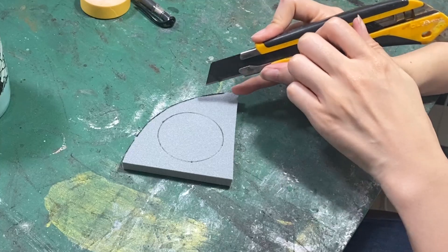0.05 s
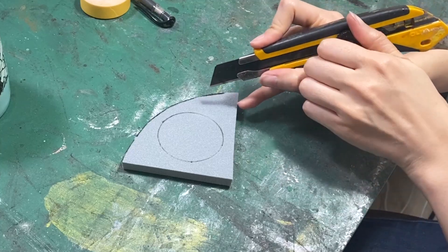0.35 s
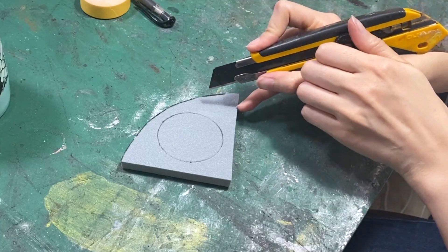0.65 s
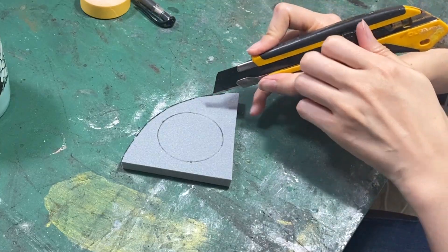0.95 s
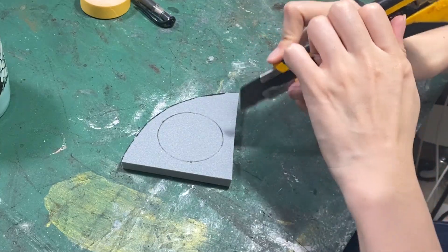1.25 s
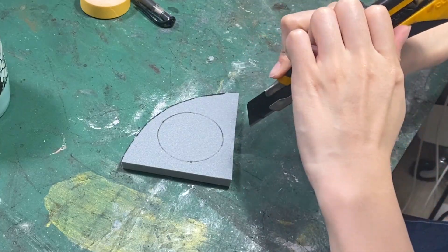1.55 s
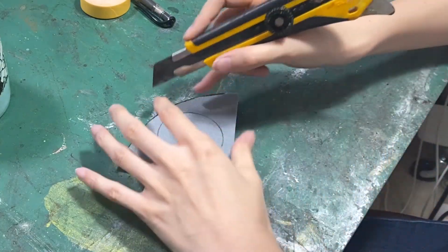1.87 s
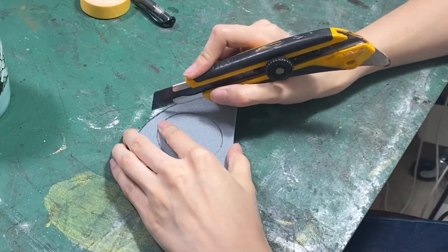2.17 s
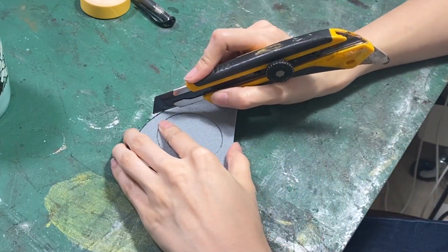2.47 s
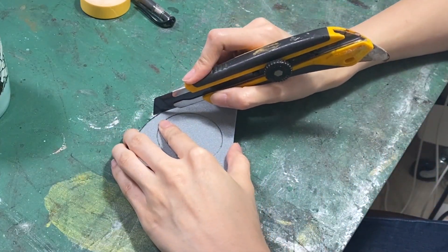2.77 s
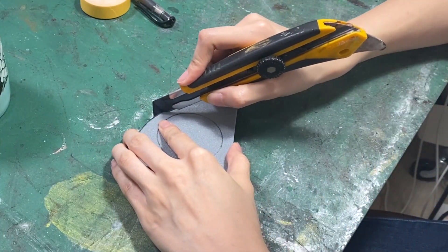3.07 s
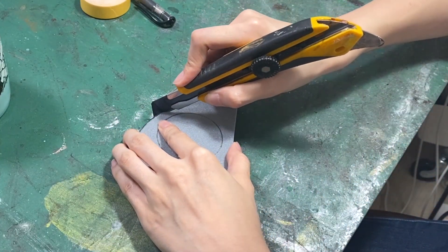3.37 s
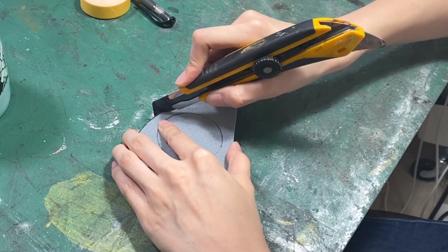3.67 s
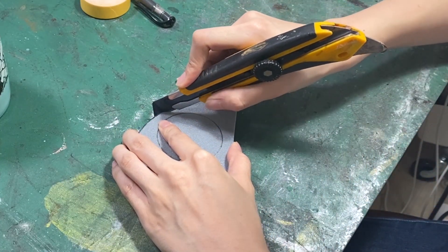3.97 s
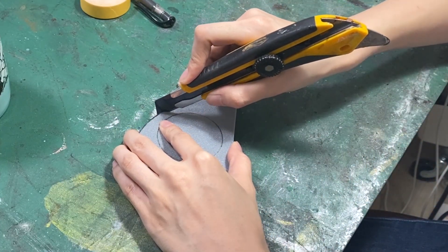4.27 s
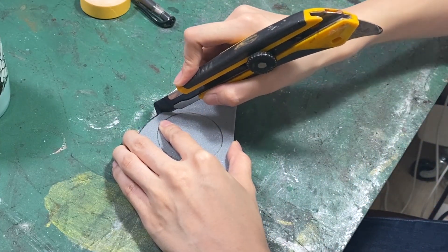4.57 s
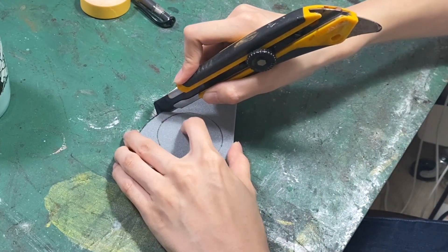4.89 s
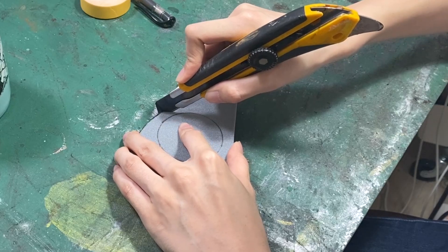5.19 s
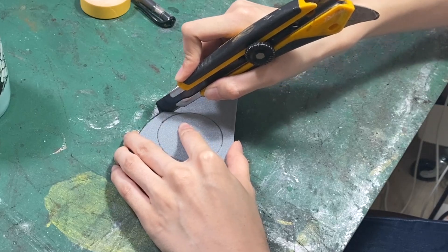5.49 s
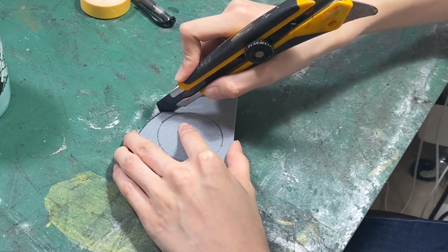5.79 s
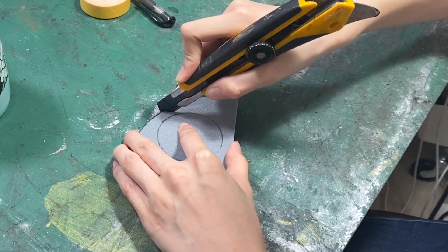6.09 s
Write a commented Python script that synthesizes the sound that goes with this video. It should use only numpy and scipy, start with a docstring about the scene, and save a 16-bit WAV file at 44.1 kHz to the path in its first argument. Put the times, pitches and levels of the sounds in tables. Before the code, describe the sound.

A craft knife blade ratchets out and back with sharp clicks, then faintly scratches through foam board in a quiet room.

```python
"""Craft knife and foam board

A knife's slider ratchets six notches out and seven back above a work table in a quiet, ventilated room.
Each notch snaps it against the steel channel and the blade rings; the colour follows the slider's place.
Then the tip is drawn through foam board: a gritty hiss, with faint scratches, squeaks, ticks and knocks.
"""
import sys
import numpy as np
from scipy import signal
from scipy.fft import rfft, irfft
from scipy.io import wavfile

SR = 44100
rng = np.random.default_rng(int(sys.argv[2]) if len(sys.argv) > 2 else 0)


def pcm_store(signal):
    """Save signal as 16-bit PCM."""
    levels = np.round(np.clip(np.atleast_2d(signal), -1, 1) * 32767)
    wavfile.write(sys.argv[1], SR, levels.astype(np.int16).T)


N = 279594
TIME = np.arange(N) / SR

# the broad, bright crack of a snap: (frequency [Hz], level [dB])
CRACK_COLOUR = [(200, -24.5), (1100, -14), (1700, -20), (2250, -16), (2650, 6.5), (3150, -11), (4200, -9),
                (5800, -6), (7000, -5.5), (8200, -1.5), (9400, 1.5), (11500, 3.5), (13000, 2),
                (13500, -1.5), (14300, 7), (15500, 8), (16200, -1)]
# the rasp of tearing foam, also used for the spring's scrape: (frequency [Hz], level [dB])
RASP_COLOUR = [(500, -2), (2500, -6), (4600, 1.5), (6000, -6.5), (7000, -9.5), (8500, -1), (10200, -0.5),
               (12000, -6.5), (13500, -3.5), (15400, -5), (16000, -35.5)]


def ratchet(turn_s=.6, scatter=0.027, rattle_db=-5, housing_hz=2300, housing_t60=0.005, scrape_db=-49):
    """Each notch snaps home and rings channel, spring and blade. Returns direct sound and room send."""
    # one snap a notch: (time [s], contact [s], blade ring [Hz], blade ring [dB], spring ping [Hz],
    # spring ping [dB], spring's upper mode [dB], crack [dB])
    snaps = [(0.1665, 0.00045, 2484, -33, 11500, -31.5, -40.5, -37),
             (0.1983, 0.00029, 2456, -32.5, 11400, -32.5, -36.5, -34.5),
             (0.223, 0.00036, 2430, -37.5, 11100, -30, -33, -34),
             (0.2411, 0.00018, 2450, -35, 10900, -41, -36, -34.5),
             (0.2921, 0.0003, 2466, -32, 11200, -43, -36.5, -42),
             (0.3495, 0.00077, 2432, -30.5, 11130, -43.5, -34, -42.5),
             (0.9429, 0.0005, 2380, -38, 11200, -34, -30.5, -35.5),
             (0.9735, 0.0008, 2350, -39, 11100, -34, -30.5, -35),
             (1.0093, 0.0004, 2360, -38, 11400, -37, -29, -36.5),
             (1.0616, 0.00057, 2445, -36.5, 11200, -35, -44.5, -38.5),
             (1.1528, 0.00027, 2455, -38.5, 12250, -29, -38.5, -33.5),
             (1.2703, 0.00012, 2480, -39.5, 11250, -29, -47, -34.5),
             (1.3957, 0.00022, 2470, -38, 12030, -31, -32.5, -37)]
    # short-lived modes of the steel channel: (frequency [Hz], width [Hz],
    # going out (level at notch 0 [dB], step per notch [dB]), coming back (the same))
    channel_modes = [(3870, 350, (-50.5, 0.78), (-58.5, 0.16)), (5040, 460, (-62, 2.9), (-50.5, 0.31)),
                     (6100, 510, (-68.5, 0.72), (-59, 1)), (7044, 1300, (-48, 1.9), (-55.5, 4.1)),
                     (8890, 1100, (-39, -1.1), (-40.5, -0.8))]
    # the blade's pair of modes, a row for out and a row for back:
    # (partner's offset [Hz], partner's level [dB], t60 [s], room send [dB])
    blade_modes = [(152.5, -12.5, 0.017, -6.5), (234.6, -4.5, 0.0089, -1.5)]
    # the blade's ring bouncing off things nearby: (delay [s], level [dB])
    echoes = [(.0064, -28.5), (0.0109, -18.5), (0.0192, -26)]
    spring_top_hz, spring_width_hz = 15100, 2100
    spring_send_db, channel_send_db = -14.5, -3.5
    mode_lead_s, scrape_lead_s = .0001, 256 / SR
    direct, send = np.zeros((2, N))
    t = np.arange(2048) / SR

    def radiate(s, sound, send_db=0):
        """Feeds one layer of a snap to the direct sound and the room send."""
        add(direct, s, sound)
        add(send, s, amp(send_db) * sound)

    notch = 1
    for s, contact, ring_hz, ring_db, ping_hz, ping_db, top_db, crack_db in snaps:
        way = int(s > turn_s)  # 0 out, 1 back
        notch += -1 if way else 1
        # every notch loads the channel differently and shifts its modes a little
        modes = []
        for hz, width, *levels in channel_modes:
            base_db, step_db = levels[way]
            shift = 1 + scatter * rng.standard_normal()
            modes.append((hz * shift, width, base_db + step_db * notch, channel_send_db))
        modes.append((ping_hz, spring_width_hz, ping_db, spring_send_db))
        modes.append((spring_top_hz, spring_width_hz, top_db, spring_send_db))
        for hz, width, db, send_db in modes:
            mode = t * np.exp(-np.pi * width * t) * np.sin(2 * np.pi * (hz * t + rng.random()))
            # one clean hit; the loose blade rattles on for a few milliseconds
            rattle = signal.fftconvolve(chatter(t, 0.00045), mode)[:len(t)]
            hit = blow(blow(mode) + amp(rattle_db) * blow(rattle))
            radiate(s - mode_lead_s, amp(db) * hit, send_db)
        # two close bending modes start in opposite directions
        offset_hz, partner_db, t60, send_db = blade_modes[way]
        partner = amp(partner_db) * np.sin(2 * np.pi * (ring_hz + offset_hz) * t)
        blade = (np.sin(2 * np.pi * ring_hz * t) - partner) * amp(-60 * t / t60)
        # the plastic housing adds a dull tock just under the ring
        tock = np.sin(2 * np.pi * housing_hz * t) * amp(-60 * t / housing_t60)
        attack = 1 - np.exp(-t / (contact + 0.00027))
        ring = amp(ring_db) * blow((blow(blade) + amp(-11) * blow(tock)) * attack)
        radiate(s, ring, send_db)
        for delay, db in echoes:
            add(direct, s + delay, amp(db) * ring)
        # the spring scrapes up the tooth, then drops with a crack
        climb = np.exp(-abs(t - scrape_lead_s) / .0012) * (t < scrape_lead_s)
        scrape = blow(colour(rng.standard_normal(len(t)) * climb, RASP_COLOUR))
        crack = blow(colour(chatter(t - scrape_lead_s, contact), CRACK_COLOUR))
        radiate(s - scrape_lead_s, amp(crack_db) * crack + amp(scrape_db) * scrape)
    return highpass([direct, send], hz=1600)  # so small a body radiates few lows


def chatter(t, contact_s):
    """Metal meets metal in a burst of tiny contacts that swells and quickly dies."""
    age = np.maximum(t, 0) / max(contact_s, 1 / SR)
    return rng.standard_normal(len(t)) * age * np.exp(-age)


def slider_rub():
    """Steel rubs on steel, harder and harder, as the thumb takes hold and as a run starts."""
    # swelling rubs: (time [s], length [s], final level [dB])
    rubs = [(0.068, 0.079, -79.5), (0.152, .012, -64), (0.666, 0.043, -85), (0.922, 0.07, -56.5)]
    # thin steel friction: (frequency [Hz], level [dB])
    rub_colour = [(3000, -21), (5800, -2.5), (6500, 1), (7300, 1), (8200, -14.5), (16000, -18.5)]
    force = np.zeros(N)
    for s, length, db in rubs:
        add(force, s, amp(db) * np.linspace(.3, 1, int(length * SR)))
    return force * unit(colour(rng.standard_normal(N), rub_colour))


def cutting(cells_per_s=2600, body_db=-13, clump_db=0.4, clump_hz=25, squeak_width_hz=300):
    """Foam cells burst under the edge: a gritty hiss that rings the knife, with scratches and squeaks."""
    # a fingernail or the tip catches the foam: (time [s], length [s], level [dB], low cut [Hz])
    scratches = [(1.673, 0.0056, -61, 4980), (1.97, 0.018, -69, 4040), (3.046, 0.0044, -56, 4530),
                 (3.055, 0.0044, -64, 4460), (3.08, 0.021, -69, 5040), (3.098, 0.03, -66, 5000),
                 (4.234, 0.0029, -57, 3470), (4.477, 0.016, -64, 6500), (4.491, 0.022, -55.5, 6750),
                 (4.82, 0.035, -57.5, 3760), (5.152, 0.0075, -65, 5000)]
    # the tone of those scratches: (frequency [Hz], level [dB])
    scratch_colour = [(500, -2.5), (3500, -4), (4600, 0.5), (6800, -2.5), (8200, -1.5), (9500, 3),
                      (12000, -5), (13500, 3), (15400, 0), (16100, -26)]
    # foam squeaks against the edge: (time [s], length [s], pitch [Hz], level [dB])
    squeaks = [(3.43, 0.44, 7000, -90), (3.3, 0.76, 4480, -93), (5.2, .3, 4900, -103)]
    hz = np.fft.rfftfreq(N, 1 / SR)
    sizes = amp(2.5 * np.minimum(rng.exponential(1, N), 4))
    cells = rng.standard_normal(N) * sizes * (rng.random(N) < cells_per_s / SR)
    clumps = unit(irfft(rfft(rng.standard_normal(N)) * rolloff(hz, clump_hz), N))
    grit = cells * amp(clump_db * clumps)
    hiss = unit(colour(grit, RASP_COLOUR))
    body = unit(signal.fftconvolve(grit, handle_ring())[:N])
    out = pressure() * (hiss + amp(body_db) * body)
    for s, length, db, low_hz in scratches:
        age = np.arange(4096) / (length * SR / 4)  # peaks a quarter of the way in
        scratch = highpass(colour(rng.standard_normal(len(age)), scratch_colour), low_hz)
        add(out, s, amp(db) * age * np.exp(1 - age) * unit(scratch))
    for s, length, squeak_hz, db in squeaks:
        whine = unit(irfft(rfft(grit) / (1 + (2 * (hz - squeak_hz) / squeak_width_hz) ** 2), N))
        out += amp(db) * whine * stroke(s, length)
    return out


def pressure(touch_s=1.5, touch_db=-82, build_db_per_s=2):
    """Force on the foam: a resting touch, and strokes that build as the edge sinks in."""
    # a light brush, then the cuts: (time [s], length [s], mid-stroke level [dB])
    strokes = [(1.446, 0.27, -76.5), (2.99, 0.28, -77.5), (3.28, 0.7, -77), (4.518, 0.24, -75.5),
               (4.958, 0.11, -75), (5.155, 0.33, -72), (6.17, 0.08, -79)]
    force = amp(touch_db) * (TIME > touch_s)
    for s, length, db in strokes:
        build_db = build_db_per_s * (TIME - s - length / 2)
        force = np.maximum(force, stroke(s, length) * amp(db + build_db))
    return force


def stroke(s, length, press_s=0.011, release_s=0.064):
    """The hand presses, holds and lets go."""
    t = TIME - s
    return np.clip(t / press_s, 0, 1) * np.clip(1 - (t - length) / release_s, 0, 1)


def knocks_and_ticks(grit_db=-14, grit_hz=10000, tick_t60=0.015, tick_handle_db=-7):
    """The knife slips and stops, ringing its handle; the blade ticks as it shifts in the channel."""
    # knocks of the knife: (time [s], level [dB], high cut [Hz])
    knocks = [(4.208, -50.5, 14000), (4.498, -64, 1500), (5.654, -62.5, 1580)]
    # ticks of the blade: (time [s], pitch [Hz], level [dB])
    ticks = [(1.508, 3970, -69), (1.9617, 4220, -72.5), (1.983, 3940, -73), (3.416, 3760, -67.5),
             (3.821, 3930, -72), (4.323, 3670, -74), (4.5, 3660, -72.5), (6.052, 4010, -83)]
    out = np.zeros(N)
    t = np.arange(3000) / SR
    for s, db, top_hz in knocks:
        grit = blow(colour(chatter(t, 0.00048), CRACK_COLOUR))
        add(out, s, amp(db) * (handle_ring(top_hz) + amp(grit_db) * rolloff(grit_hz, top_hz) * grit))
    for s, hz, db in ticks:
        ping = np.sin(2 * np.pi * hz * t) * amp(-60 * t / tick_t60) * (1 - np.exp(-t / 0.00044))
        add(out, s, amp(db) * (blow(ping) + amp(tick_handle_db) * handle_ring()))
    return out


def handle_ring(top_hz=20000, attack_s=0.00015):
    """One ring of the held knife; a soft blow barely reaches the modes above top_hz."""
    # modes of the knife held on the table: (frequency [Hz], level [dB], t60 [s])
    modes = [(338, -3, 0.0072), (598, -3.5, 0.012), (1043, 4.5, 0.0052), (1556, -0.5, 0.0086),
             (2420, -6, 0.024), (3620, -0.5, 0.013), (4270, 5, 0.006), (5000, 2.5, 0.0053),
             (7340, -1, 0.0069), (9290, 0.5, 0.014)]
    t = np.arange(3000) / SR
    ring = np.zeros(len(t))
    for hz, db, t60 in modes:
        phase = rng.uniform(0, 2 * np.pi)
        ring += amp(db - 60 * t / t60) * rolloff(hz, top_hz) * np.sin(2 * np.pi * hz * t + phase)
    return blow(ring * (1 - np.exp(-t / attack_s)))


def table_top(x):
    """The direct sound and its first reflections off the table and the hands."""
    # early reflections: (delay [s], level [dB])
    bounces = [(.0012, -20), (.0027, -17.5), (.0052, -19.5)]
    out = x.copy()
    for delay, db in bounces:
        add(out, delay, amp(db) * x)
    return out


def room(x, predelay_s=0.0016, build_s=0.0013):
    """Dense small reflections from all round make a short stereo tail."""
    # tone of the tail: (frequency [Hz], level against the send [dB])
    tail_colour = [(500, 10), (1900, 2.5), (2300, -9.5), (2480, -9), (2600, 1), (2850, 7.5), (3600, -5),
                   (5000, -3.5), (6000, 0.5), (7000, -1.5), (8300, -6), (9500, -5.5), (11300, -2.5),
                   (13000, -4), (15400, -3.5), (16100, -30)]
    # decay of the tail: (frequency [Hz], t60 [s])
    decay_times = [(500, 0.1), (2600, 0.32), (7000, 0.26), (11000, 0.34), (15000, .2)]
    size = SR // 2
    hz, t, spectra = signal.stft(diffuse(size), SR, nperseg=256)
    t60 = read(decay_times, hz)[:, None]
    equal_energy = np.sqrt(2 * np.log(1000) / (t60 * SR))  # a longer decay is no louder
    fade = amp(read(tail_colour, hz)[:, None] - 60 * t / t60) * equal_energy
    tail = signal.istft(spectra * fade, SR, nperseg=256)[1][:, :size]
    tail *= 1 - np.exp(-np.maximum(TIME[:size] - predelay_s, 0) / build_s)
    return signal.fftconvolve(x[None], tail, axes=1)[:, :N]


def room_tone(vent_db=-59, hiss_db=-78, waver=1.2):
    """Low ventilation noise with a wavering hum and a thin hiss."""
    # rumble of the ventilation: (frequency [Hz], level [dB])
    vent_colour = [(20, -49), (33, -27), (48, -3), (70, -1), (100, -4.5), (135, 0), (205, -2.5),
                   (245, -6.5), (295, -4), (400, -4), (470, -8.5), (640, -5.5), (730, -9), (815, -7),
                   (870, -11), (1100, -11), (2200, -18), (4000, -27.5), (7000, -34), (11000, -39),
                   (16000, -60.5)]
    # high hiss: (frequency [Hz], level [dB])
    hiss_colour = [(5000, -4.5), (8400, -5.5), (9200, 4.5), (9600, -0.5), (10100, 2.5), (11600, -7.5),
                   (12400, -19), (13300, -7.5), (14000, -24), (15200, -21.5), (15900, -39)]
    # hum tones: (pitch [Hz], level [dB], waver rate [Hz])
    hums = [(50.6, -69.5, 7), (148.5, -70, 9.2), (189.8, -67.5, 15), (381.6, -74, 7), (769.5, -76.5, 18)]
    # stereo balance of the bed: (frequency [Hz], left minus right [dB])
    balance = [(60, -3.5), (130, -4.5), (290, -5.5), (640, -1.5), (1400, -0.5), (3000, 0.5)]
    hz = np.fft.rfftfreq(N, 1 / SR)
    bed = amp(vent_db) * unit(colour(diffuse(N), vent_colour))
    bed += amp(hiss_db) * unit(colour(diffuse(N), hiss_colour))
    for hum_hz, db, waver_hz in hums:
        swell, drift = unit(irfft(rfft(rng.standard_normal((2, N))) / (1 + (hz / waver_hz) ** 2), N))
        hum = (1 + waver * (swell + 1j * drift)) * np.exp(2j * np.pi * hum_hz * TIME)
        bed += amp(db) * unit(hum.real)
    return pan_bands(bed, balance)


def diffuse(size):
    """White noise as two microphones hear it, left and right alike in some bands and opposed in others."""
    # likeness of left and right: (frequency [Hz], coherence [-1 to 1])
    coherence = [(40, 0.8), (160, 0.59), (270, 0.84), (450, -0.18), (740, -0.32), (1220, -0.29),
                 (2200, 0.25), (4000, -0.13), (7500, 0.036), (8500, 0.66), (10500, 0.83), (16000, 0.81)]
    same = read(coherence, np.fft.rfftfreq(size, 1 / SR))
    left, other = rfft(rng.standard_normal((2, size)))
    return irfft(np.array([left, same * left + np.sqrt(1 - same ** 2) * other]), size)


def at_microphones(x, treble_lag_s=0.0001834, crossover_hz=8000, low_lag_s=0.000014):
    """The two microphones are nearly in step lower down; in the top treble the left one lags."""
    hz = np.fft.rfftfreq(N, 1 / SR)
    treble = (1 + np.tanh((hz - crossover_hz) / 500)) / 2
    lag_cycles = (hz * treble_lag_s - 1) * treble + hz * low_lag_s * (1 - treble)
    return np.array([irfft(rfft(x[0]) * np.exp(-2j * np.pi * lag_cycles), N), x[1]])


def pan_bands(x, balance):
    """Shares a sound between left and right, band by band."""
    left_gain = amp(read(balance, np.fft.rfftfreq(N, 1 / SR)) / 2)
    return irfft(rfft(x) * np.array([left_gain, 1 / left_gain]), N)


def colour(x, points):
    """Equalises a signal with a (Hz, dB) curve."""
    size = x.shape[-1]
    return irfft(rfft(x) * amp(read(points, np.fft.rfftfreq(size, 1 / SR))), size)


def highpass(x, hz):
    """A low cut of 18 dB an octave."""
    return signal.sosfilt(signal.butter(3, hz, "highpass", fs=SR, output="sos"), x)


def rolloff(hz, top_hz):
    """Gain of a high cut of 24 dB an octave."""
    return 1 / (1 + (hz / top_hz) ** 4)


def read(points, hz):
    """Reads a curve on a log-frequency axis."""
    point_hz, value = np.transpose(points)
    return np.interp(np.log(hz + 1), np.log(point_hz), value)


def amp(db):
    """Decibels to gain."""
    return 10 ** (np.asarray(db) / 20)


def unit(x):
    """Scales to rms 1."""
    return x / np.sqrt(np.mean(x ** 2) + 1e-30)


def blow(x):
    """Scales a short sound to the energy of 10 ms at rms 1."""
    return x / np.sqrt(np.sum(x ** 2) / (SR / 100) + 1e-30)


def add(mix, s, sound):
    """Mixes a sound in at time s."""
    part = mix[round(s * SR):][:len(sound)]
    part += sound[:len(part)]


def scene(knock_send_db=-5, foam_send_db=-7):
    """The knife up close over reverb and room tone; the hands shield knocks and cuts from the room."""
    # stereo balance of the knife: (frequency [Hz], left minus right [dB])
    balance = [(500, -15.5), (2500, -2), (4200, -2), (7000, -6.5), (8800, -6.5), (10500, 1.5), (15000, -1)]
    clicks, clicks_send = ratchet()
    rub, foam, knocks = slider_rub(), cutting(), knocks_and_ticks()
    near = pan_bands(table_top(clicks + rub + foam + knocks), balance)
    far = room(clicks_send + rub + amp(foam_send_db) * foam + amp(knock_send_db) * knocks)
    return at_microphones(near + far + room_tone())


def record(dry, open_s=.069, fade_s=.004, edge_hz=16500):
    """A moment of silence, a quick fade-in and a steep high cut."""
    fade_in = np.clip((TIME - open_s) / fade_s, 0, 1)
    low_pass = signal.firwin(255, edge_hz, window=("kaiser", 8), fs=SR)
    return signal.oaconvolve(dry * fade_in, low_pass[None], "same", axes=1)


dry = scene()
out = record(dry)
pcm_store(out)
```